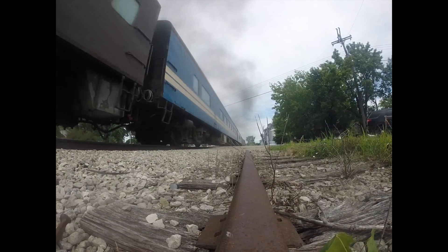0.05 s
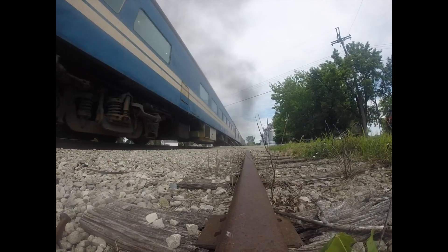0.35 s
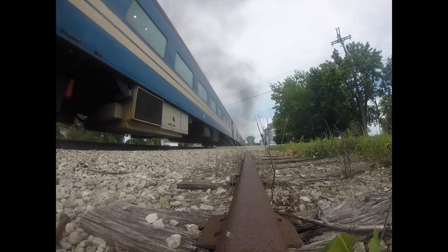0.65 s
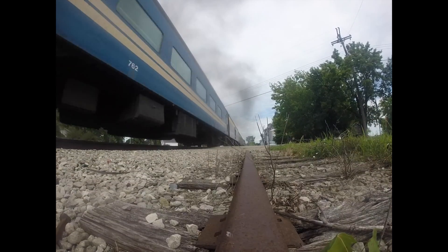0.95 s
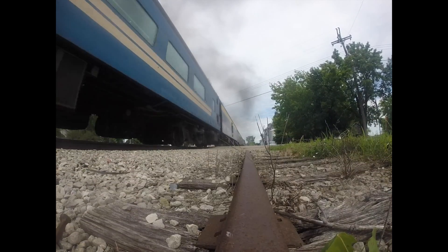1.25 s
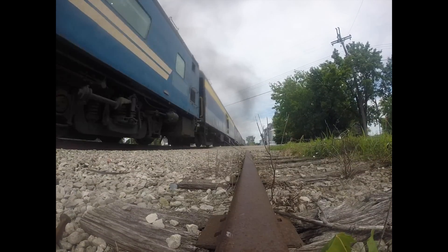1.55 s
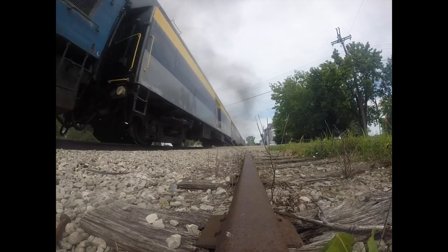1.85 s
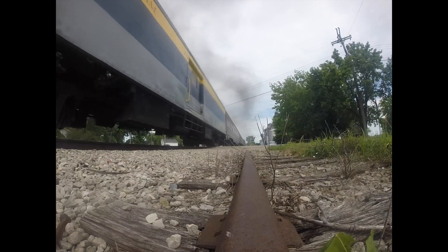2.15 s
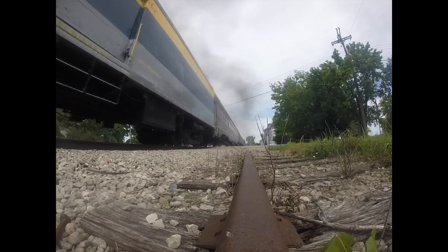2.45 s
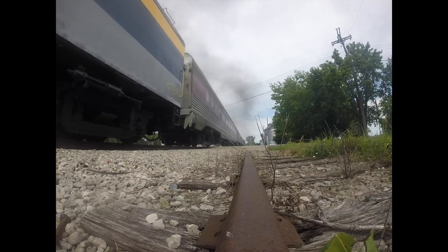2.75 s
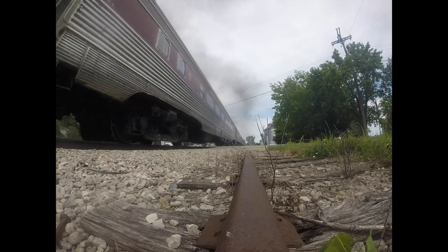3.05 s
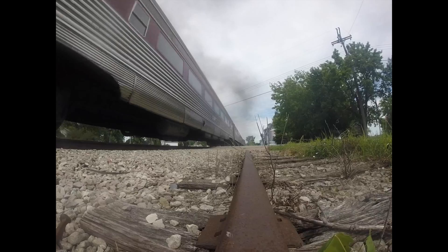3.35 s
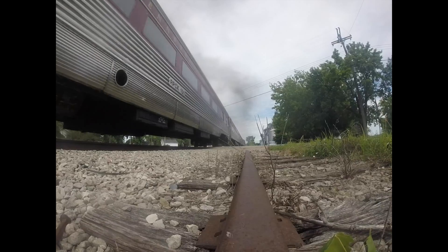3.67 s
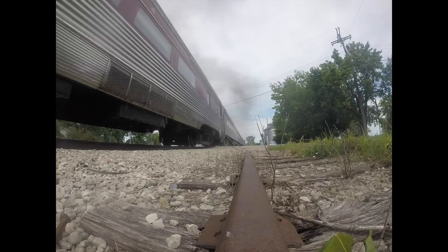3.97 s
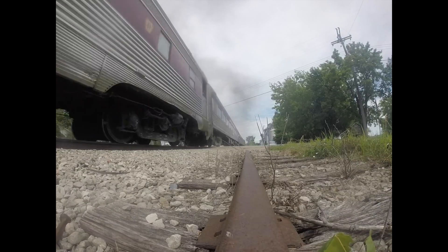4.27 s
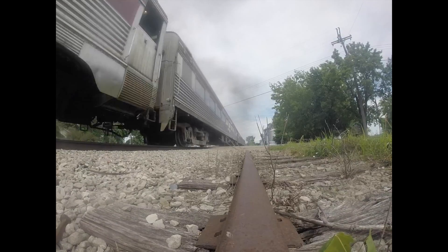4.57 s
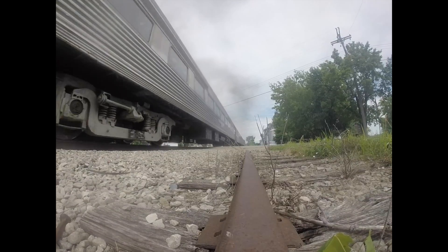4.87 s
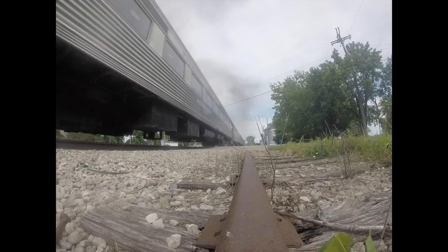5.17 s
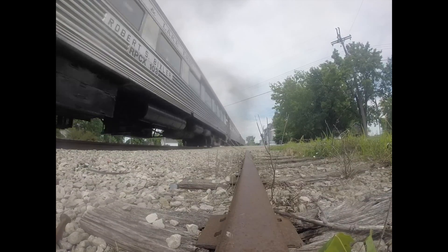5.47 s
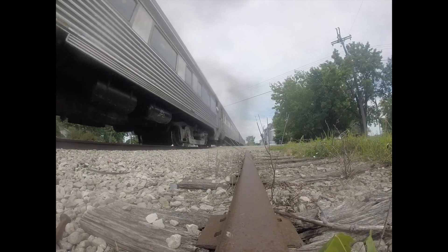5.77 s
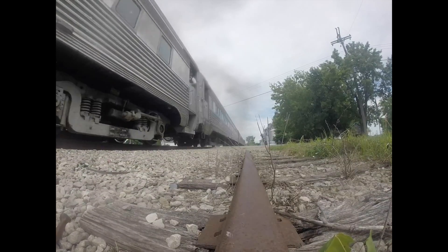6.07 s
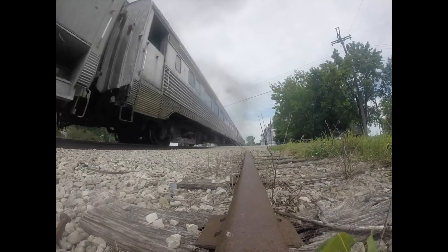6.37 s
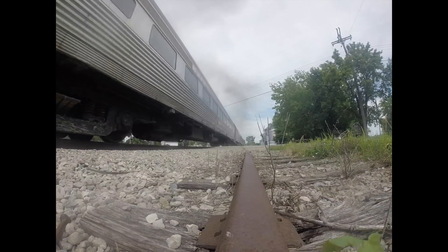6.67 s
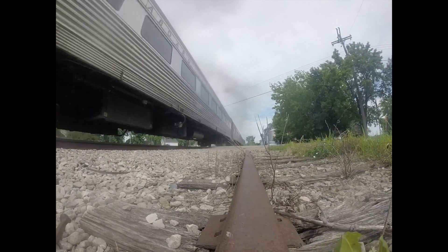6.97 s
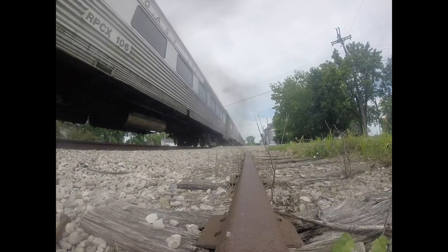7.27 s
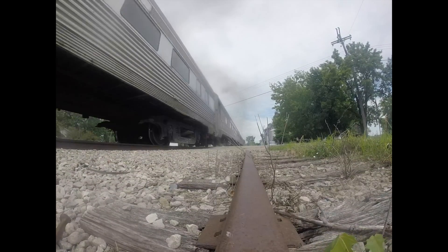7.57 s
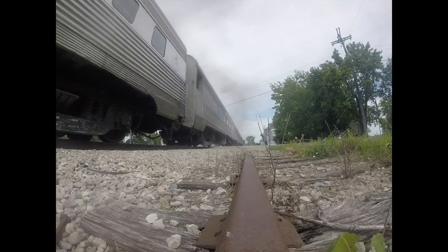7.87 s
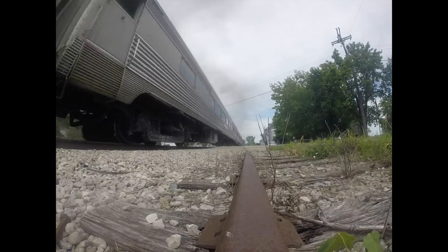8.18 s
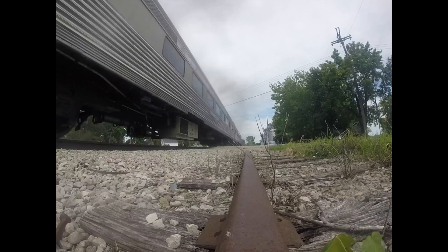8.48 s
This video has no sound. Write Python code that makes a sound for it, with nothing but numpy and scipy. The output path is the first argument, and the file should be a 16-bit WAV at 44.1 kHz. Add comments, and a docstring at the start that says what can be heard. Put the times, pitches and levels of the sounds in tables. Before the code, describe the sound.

Hard, evenly spaced wheel clacks open over a deep rumble and recede as a passenger train keeps rolling by, close to a microphone on the neighboring rail. One sharp metal screech follows. Each set of wheels brings a swell of roar with scraping, thin squeals and clinking steel, while the trembling ground makes the microphone mount thud and rattle. A generator hums past briefly in the second half, and grit ticks lightly at the finish.

```python
"""A deep rumble and a hard clack-clack come first: passenger coaches roll past, and a wheel with a flat
spot strikes the rail once a turn, fading into the distance. The shaking ground sways a mount on the
next rail near 40 Hz and makes it chatter. Wheels roar, grind and squeal as they pass; loose steel clinks.
The gangway plates between two coaches screech once, a generator drones by under one coach,
and near the end a few specks of grit tick."""
import sys
import numpy as np
from scipy import signal
from scipy.fft import rfft, irfft, next_fast_len
from scipy.io import wavfile
from scipy.ndimage import uniform_filter1d, map_coordinates

SR = 44100
rng = np.random.default_rng(int(sys.argv[2]) if len(sys.argv) > 2 else 0)


def unload_audio(sound):
    """Save the sound as a 16-bit wav file, at the path given as the first command line argument."""
    columns = np.transpose(np.atleast_2d(sound))
    # keep every value between -1 and 1, then stretch to whole-number steps
    steps = np.round(np.clip(columns, -1, 1) * 32767)
    wavfile.write(sys.argv[1], SR, steps.astype(np.int16))


N = 376159
T = np.arange(N) / SR

# Levels in the tables are relative: each source sets its own overall loudness.
# grit landing on the case that the mount holds (time [s], level [dB])
GRIT_TICKS = [(8.069, -35), (8.211, -29), (8.3569, -40), (8.441, -13)]
# resonances of the generator's silencer (pitch [Hz], width [Hz], level [dB])
SILENCER_MODES = [(132, 15, -9), (172.1, 37.4, 6), (205, 50, 4.5), (340, 78, -8), (580, 380, -17)]

# swells of the mount's sway, each lasting until the next (start [s], level [dB])
SWAY_SWELLS = [(-.15, -10), (.2, -12.5), (.38, -16), (.55, -14.5), (.77, -12), (.86, -11.5), (1.01, -11.5),
               (1.15, -13.5), (1.3, -6), (1.61, -8.5), (1.77, -8), (2.07, -9.5), (2.25, -8.5), (2.44, -15),
               (2.68, -12), (2.99, -7), (3.3, -8), (3.49, -7.5), (3.68, -9.5), (3.85, -12.5), (4.0, -14.5),
               (4.13, -14.5), (4.27, -8.5), (4.79, -6.5), (5.04, -9), (5.36, -12), (5.57, -17.5),
               (5.82, -14.5), (5.96, -7.5), (6.31, -8), (6.43, -9), (6.67, -7), (6.9, -9), (7.14, -8.5),
               (7.28, -13), (7.43, -12), (7.601, -15.5), (7.69, -10.5), (7.87, -6), (8.1, -6), (8.25, -7.5),
               (8.4, -8)]
# how fast the mount sways (time [s], pitch [Hz])
SWAY_PITCH = [(0, 40.37), (.85, 39.72), (1.05, 42.7), (1.4, 44.05), (1.75, 42.43), (2.2, 44.15),
              (2.8, 40.4), (3.02, 41.48), (3.2, 38.9), (3.45, 41.46), (3.78, 38.51), (4.22, 43.38),
              (4.55, 37.21), (5.2, 39.37), (5.7, 41.9), (6.55, 38.38), (7.3, 39.5), (8.2, 41.2),
              (8.53, 39.1)]
# resonances of the mount (pitch [Hz], width [Hz], level [dB])
MOUNT_MODES = [(73, 23, 8.5), (104.5, 24, -3), (170, 63, -14), (227.4, 28.5, 6.5), (337, 90, -13.5),
               (440.5, 51, -5)]
# bouts of the mount chattering on the rail (start [s], length [s], level [dB])
CHATTER_BOUTS = [(0.056, 0.0047, -20), (0.183, 0.017, -24), (0.246, 0.1, -19), (0.352, 0.089, -20.5),
                 (0.638, 0.044, -16), (0.782, 0.035, -19.5), (0.839, 0.052, -17.5), (1.289, 0.072, -28),
                 (2.272, 0.049, -29.5), (3.046, 0.016, -20.5), (3.16, 0.023, -14.5), (3.188, 0.029, -11.5),
                 (3.355, 0.044, -20), (3.531, 0.038, -18), (3.638, 0.044, -19), (3.688, 0.096, -16.5),
                 (4.474, 0.021, -17), (4.558, 0.036, -11.5), (4.625, 0.064, -15.5), (4.812, 0.066, -20.5),
                 (4.909, 0.031, -11.5), (4.996, 0.015, -17.5), (5.077, 0.11, -16.5), (5.197, 0.036, -15.5),
                 (6.031, 0.052, -23), (6.129, 0.046, -17), (6.352, 0.029, -23.5), (6.406, 0.015, -15.5),
                 (6.486, 0.028, -14), (6.733, 0.05, -18.5), (8.11, 0.021, -24.5), (8.349, .015, -21)]
# tones in the mount's boom (multiple of the lowest pitch [ratio], level [dB])
JUDDER_HARMONICS = [(1, -7.5), (2, -0.5), (4, -20)]

# gangway plates rubbing (time [s], slip rate [Hz], level [dB])
PLATE_RUB = [(1.645, 948, -100), (1.655, 949, -66), (1.665, 950, -38), (1.70, 919, -23), (1.74, 908, -23.5),
             (1.785, 921, -27), (1.81, 920, -29.5), (1.87, 914, -39), (1.95, 920, -50), (2.0, 888, -52),
             (2.5, 900, -100)]
# tone colour of that rubbing (frequency [Hz], level [dB])
PLATE_SPECTRUM = [(500, -36), (930, -24), (1850, -6), (2770, 3.5), (3700, 1.5), (4600, 3.5), (5400, -8),
                  (6500, -3), (8000, -16), (9800, -5.5), (12000, -13), (15000, -21)]
# piercing notes of the plates (start [s], length [s], pitch [Hz], level [dB])
PLATE_CRIES = [(1.702, .016, 1700, -29.5), (1.73, 0.013, 1900, -29), (1.5, .022, 2800, -27),
               (1.732, .02, 2775, -25), (1.753, 0.0383, 2750, -19.5), (1.738, 0.0354, 3660, -21.5),
               (1.778, .017, 3620, -30), (1.78, .016, 4600, -29), (1.745, 0.032, 5560, -33),
               (1.698, 0.03, 6520, -29), (1.758, 0.027, 6470, -26.5), (1.785, 0.024, 6440, -32),
               (1.71, .085, 9370, -37.5), (1.7, .09, 8470, -44), (1.71, .09, 10900, -43)]
# knocks of loose steel (time [s], ring [dB], hollow low note [dB], crunch [dB])
STEEL_KNOCKS = [(.611, -11.5, -21, -14), (.623, -16, -27, -25), (.635, -14, -34, -19),
                (.792, -14.5, -17, -18), (.803, -26, -30, -22), (.976, -25, -29, -30),
                (.993, -22, -23, -28), (1.137, -34, -38, -26), (2.046, -23, -42, -28),
                (2.06, -24, -45, -24), (2.076, -24, -40, -24), (2.229, -25, -38, -28),
                (2.242, -29, -35, -18), (2.274, -27, -40, -22), (3.366, -25, -31, -22),
                (3.383, -20.5, -25, -24), (3.404, -32, -31, -36), (3.425, -29, -26, -34),
                (3.46, -32, -29, -33), (3.49, -30, -34, -26), (3.54, -20, -23.5, -26),
                (3.561, -27, -26, -35), (3.634, -28, -28, -32), (3.736, -22.5, -29, -21),
                (3.752, -30, -42, -37), (3.857, -35, -48, -48), (3.898, -40, -35, -46),
                (3.915, -32, -39, -41), (5.328, -34, -33, -37), (5.346, -28, -42, -27),
                (5.359, -20, -30, -25), (5.378, -27, -21, -26), (5.392, -32, -41, -35),
                (5.414, -28, -30, -36), (5.432, -39, -32, -42), (6.319, -37, -29, -38),
                (6.361, -32, -27, -30), (6.536, -12, -24, -41), (6.547, -28, -50, -40),
                (6.871, -29, -26, -36), (6.906, -27, -27, -32), (6.924, -26, -32, -37),
                (7.038, -27, -40, -24), (7.051, -23, -25, -24), (7.086, -31, -34, -32),
                (8.048, -38, -31, -29), (8.12, -30, -33, -32), (8.283, -41, -31, -33)]
# ringing notes of the loose steel (pitch [Hz], time to fade by 60 dB [s], level [dB])
STEEL_MODES = [(1440, 0.028, -15), (1910, 0.04, -14), (2250, 0.093, -4), (2460, 0.042, -5.5),
               (2664, 0.058, -3.5), (2787, 0.049, -1)]

# couplings between coaches going by (time when nearest [s], light chatter [dB], rumble [dB], roar [dB])
COUPLING_PASSES = [(0.302, -34, -29, -33), (1.66, -47.5, -36, -32.5), (3.22, -52, -34.5, -34.5),
                   (4.72, -38, -28.5, -34.5), (6.4, -44, -29, -34.5), (8.1, -42.5, -38, -36)]
# tone colours of the wheels' rumble, roar and hiss (frequency [Hz], level [dB])
RUMBLE_SPECTRUM = [(25, -43), (60, 0), (120, -17.5), (220, -11.5), (450, -20), (900, -80)]
ROAR_SPECTRUM = [(80, -27), (220, -3.5), (450, 2), (700, -2), (950, -4), (1200, -6.5), (1700, -3.5),
                 (2500, -5), (4200, -6.5), (5300, -28), (7000, -26), (15000, -39)]
HISS_SPECTRUM = [(2500, -17), (4500, 2), (6300, -2), (7400, -4.5), (8300, -15.5), (10500, -15.5),
                 (12500, -26.5), (15000, -39)]
# rise and fall of the hiss (time [s], level [dB])
HISS_SWELLS = [(0, -32.5), (.42, -35), (.7, -41), (2.1, -47.5), (2.55, -45), (3.02, -38.5), (3.5, -41),
               (3.95, -44.5), (4.35, -35.5), (4.75, -46), (4.95, -42.5), (5.45, -51), (5.75, -37),
               (6.15, -39), (6.82, -49), (7.0, -40.5), (7.3, -37.5), (7.65, -45.5), (7.9, -42),
               (8.53, -43.5)]
# resonances of the rail (pitch [Hz], width [Hz], level [dB])
RAIL_MODES = [(891, 120, -11), (1475, 106, 3.5), (1857, 103, 0.5), (2465, 260, -1), (2774, 48, 2),
              (3423, 354, 1), (4162, 150, -3), (4760, 270, -10), (5740, 120, -10), (6176, 270, -7.5)]
# wheels grinding on the rail (middle [s], half length [s], pitch [Hz], width [Hz], level [dB])
WHEEL_SCRAPES = [(2.286, 0.045, 3800, 1500, -33), (2.852, 0.24, 3570, 2200, -38),
                 (3.02, .03, 384, 180, -30.5), (3.05, 0.091, 3160, 3000, -32),
                 (3.198, 0.15, 2970, 3205, -35.5), (3.366, 0.081, 3620, 3497, -30.5),
                 (3.474, 0.087, 3770, 3000, -33), (4.577, 0.087, 2200, 2001, -39.5),
                 (4.77, .09, 338, 70, -34), (4.82, 0.052, 2200, 2000, -38), (5.779, 0.037, 3479, 700, -29),
                 (5.847, 0.064, 3700, 1001, -33), (5.925, 0.081, 3480, 1800, -36),
                 (6.092, .07, 2200, 2795, -32.5), (6.16, 0.029, 2985, 3400, -32),
                 (6.35, 0.081, 2600, 2393, -37), (7.305, 0.13, 2180, 1997, -35.5),
                 (8.056, .025, 2603, 3000, -36), (8.102, 0.051, 2982, 2820, -30),
                 (8.263, 0.066, 2700, 2400, -35.5)]
# squeals of the flanges, the wheels' guiding rims (middle [s], half length [s], pitch [Hz], level [dB])
FLANGE_SQUEALS = [(1.991, 0.043, 3560, -32), (2.254, 0.12, 4910, -40), (2.409, 0.086, 1902, -33),
                  (2.42, 0.047, 3470, -29), (2.768, 0.093, 4410, -40), (2.899, 0.073, 3520, -33),
                  (3.002, .07, 4460, -35), (3.313, 0.024, 3390, -35), (3.373, 0.052, 5080, -37),
                  (3.485, 0.039, 3490, -35), (3.485, 0.017, 1450, -29.5), (3.521, 0.072, 5050, -48),
                  (3.555, 0.029, 3420, -34), (3.67, 0.04, 4975, -45), (3.845, 0.031, 3347, -34),
                  (6.14, .04, 4130, -27), (6.169, 0.032, 3400, -33), (6.528, 0.027, 3570, -29),
                  (6.995, 0.08, 4490, -41), (8.148, 0.027, 3270, -32), (8.362, 0.034, 4130, -35)]
# wheels that sing as they pass (time when nearest [s], main pitch [Hz], level [dB])
SINGING_WHEELS = [(0.31, 4200, -35.5), (0.43, 4085, -32.5), (2.081, 4230, -50), (2.26, 4020, -42),
                  (2.8, 4480, -44), (3.02, 4370, -43.5), (3.22, 4140, -45.5), (3.47, 4340, -46),
                  (4.42, 4124, -40), (4.68, 4240, -51), (4.99, 4120, -44), (5.22, 4230, -51.5),
                  (6.14, 4137, -45.5), (6.39, 4350, -45.5), (6.59, 4065, -44), (6.891, 4100, -44.5),
                  (7.86, 4100, -44.5), (8.33, 4063, -43.5)]
# ringing notes of one wheel (multiple of the main pitch [ratio], level [dB])
WHEEL_NOTES = [(0.625, -5), (.812, 0), (1, 1), (1.165, -5.5), (1.49, -13.5)]

# tone colour of the flat spot's crash (frequency [Hz], level [dB])
CLACK_SPECTRUM = [(100, 18.5), (300, 18), (600, 7.5), (950, 10), (1500, 9), (2600, 3.5), (3600, 9.5),
                  (5000, -5), (6500, -21), (8500, -12), (11000, -20), (15000, -28)]
# boosts and cuts for the flat spot's first, close strikes (strength [dB], brightness [dB], ring [dB])
CLOSE_STRIKES = [(-8.5, 7.5, -24), (0, 0, -0.5), (1.5, -3.5, -4), (-2.5, 5.5, -23), (5, -3.5, -8.5)]
# ringing notes of the struck wheel (pitch [Hz], time to fade by 60 dB [s], level [dB])
CLANG_MODES = [(884, 0.053, 0.5), (1500, 0.12, -9), (1960, 0.18, -10), (2640, 0.1, -9), (3460, 0.17, 3.5),
               (4700, 0.12, -10), (5700, 0.16, -18), (6440, 0.14, -13)]

SPEED_M_S, TRACK_M = 16, 3  # speed of the train, distance to its track
BOGIE_M = 2.4  # from a coupling to the bogie (wheeled frame) on either side
SHAKE_REACH_M, ROAR_REACH_M = 4.5, 6.94  # a bogie this far along the track is heard at half power
CHATTER_ATTACK_S, CHATTER_DECAY_S = 0.0056, 0.025
KNOCK_RISE_S = 0.0032


def undb(db):
    """Turn decibels into a gain."""
    return 10 ** (np.asarray(db) / 20)


def unit(x):
    """Scale a signal to an average power of 1."""
    return x / np.sqrt(np.mean(x ** 2))


def curves(table):
    """Turn a table that starts with a time column into curves, one value a sample."""
    times, *columns = np.transpose(table)
    return [np.interp(T, times, column) for column in columns]


def noise():
    """White noise."""
    return rng.standard_normal(N)


def walk(rate):
    """A random wobble of size about 1 that heads for a new value `rate` times a second."""
    knots = rng.standard_normal(N // 8)
    return unit(np.interp(T * rate, np.arange(len(knots)), knots))


def colour(x, points):
    """Shape a sound with a spectrum of (frequency [Hz], level [dB]) points."""
    hz, db = np.transpose(points)
    size = next_fast_len(N + 8192)
    bin_hz = np.maximum(np.arange(size // 2 + 1) * SR / size, 1)
    gain = undb(np.interp(np.log(bin_hz), np.log(hz), db))
    return irfft(rfft(x, size) * gain, size)[:N]


def lowpass(x, hz, order=6):
    """Take off the treble above `hz`."""
    return signal.sosfilt(signal.butter(order, min(hz, .45 * SR), fs=SR, output="sos"), x)


def ring(x, modes):
    """Pass a sound through resonances (pitch [Hz], width [Hz], level [dB])."""
    return sum(undb(db) * signal.lfilter(*signal.iirpeak(hz, hz / width, fs=SR), x)
               for hz, width, db in modes)


def steep(x, mode):
    """Apply one resonance twice, so that little gets through away from its pitch."""
    hz, width, _ = mode
    return ring(ring(x, [(hz, width, 0)]), [mode])


def pulses(turns, scatter_db):
    """One click of random size each time `turns` passes a whole number."""
    at = np.flatnonzero(np.diff(np.floor(np.maximum.accumulate(turns))) > 0)
    out = np.zeros(N)
    out[at] = undb(scatter_db * noise()[:len(at)])
    return out


def blows(times, dbs):
    """Single clicks at given times and levels."""
    out = np.zeros(N)
    out[np.clip((np.asarray(times) * SR).astype(int), 0, N - 1)] = undb(dbs)
    return out


def fade(x, t60):
    """Give each click a tail that falls by 60 dB in `t60` seconds."""
    return signal.lfilter([1], [1, -np.exp(-np.log(1000) / (t60 * SR))], x)


def bout(start, length, attack_s, decay_s):
    """A loudness curve that rises, holds and dies away."""
    return np.clip((T - start) / attack_s, 0, 1) * np.exp(-np.clip(T - start - length, 0, 1) / decay_s)


def bogies(dbs, reach_m):
    """A gain that swells as the two bogies at each coupling roll by, given one level a coupling."""
    power = 0
    for (nearest_s, *_), db in zip(COUPLING_PASSES, dbs):
        for offset_m in (-BOGIE_M, BOGIE_M):
            along_m = SPEED_M_S * (T - nearest_s) + offset_m
            power = power + undb(db) ** 2 / (1 + (along_m / reach_m) ** 2)
    return np.sqrt(power / 2)


def grit():
    """Specks of grit hit the case on the mount, each with a tiny bright tick."""
    bright = unit(ring(noise(), [(5494, 6500, -1.5), (10870, 10600, -10)]))
    return undb(-2) * bright * fade(blows(*np.transpose(GRIT_TICKS)), t60=0.0057)


def generator(nearest_s=5.915, firing_hz=60.64, pass_s=0.209, level_db=-25, throb_db=6):
    """An engine under the floor fires into its silencer; the drone drops in pitch as it goes by."""
    away = (T - nearest_s) / pass_s
    turns = np.cumsum(firing_hz * (1 - 0.044 * np.tanh(away))) / SR
    turns -= np.interp(nearest_s, T, turns)
    gas = pulses(turns, scatter_db=1) + .016 * noise()
    boom = sum(steep(gas, mode) for mode in SILENCER_MODES)
    throb = undb(throb_db * np.cos(np.pi * turns / 2))  # four unequal cylinders: one throb in four firings
    return unit(throb * boom) * undb(level_db) / (1 + away ** 2) ** 0.97


def sway_strength():
    """The sway grows and shrinks in rounded arches, almost stopping between them."""
    starts, db = np.transpose(SWAY_SWELLS)
    place = np.interp(T, np.append(starts, N / SR + .05), np.arange(len(starts) + 1))
    arch = np.sin(np.pi * (place % 1) ** 0.91) ** 0.7
    return uniform_filter1d(undb(db)[place.astype(int)] * arch, size=1100)


def judder(turns, judder_hz=112.5, rise=0.07, rise_s=0.055):
    """In each bout of chatter the mount booms on a low note that rises a little, jolted once a swing."""
    out, drift = np.zeros(N), .01 * walk(70)
    jolt = .1 * np.sin(2 * np.pi * turns)
    for start, length, db in CHATTER_BOUTS:
        near = (T > start) & (T < start + length + .2)
        hz = judder_hz * (1 + rise * np.tanh((T[near] - start) / rise_s) + drift[near])
        phase = 2 * np.pi * (np.cumsum(hz) / SR + rng.random()) + jolt[near]
        note = sum(undb(tone_db) * np.sin(k * phase) for k, tone_db in JUDDER_HARMONICS)
        out[near] += undb(db) * bout(start, length, CHATTER_ATTACK_S, CHATTER_DECAY_S)[near] * note
    return out


def mount():
    """Shaking ground sways the mount; when it chatters, its foot thuds and ticks on the rail each swing."""
    turns = np.cumsum(curves(SWAY_PITCH)[0] * (1 + 0.02503 * walk(9))) / SR
    sway = sway_strength() * unit(np.sin(2 * np.pi * turns))
    tremor = unit(steep(noise(), (40, 20, 0)))  # the ground never quite rests
    knocks = pulses(turns + .03 * walk(60), scatter_db=2.5)
    scuffs = 0.014 * noise()
    body = lowpass(sum(steep(knocks + scuffs, mode) for mode in MOUNT_MODES), hz=540)
    body /= np.sqrt(uniform_filter1d(body ** 2, SR // 25) + 1e-12)  # even out the loudness
    bouts = sum(undb(db) * bout(start, length, CHATTER_ATTACK_S, CHATTER_DECAY_S)
                for start, length, db in CHATTER_BOUTS)
    _, chatter_db, *_ = np.transpose(COUPLING_PASSES)
    light_chatter = bogies(chatter_db, SHAKE_REACH_M) * undb(6.5 * walk(12))
    thuds = (light_chatter + .4 * bouts) * body
    bright = unit(steep(noise(), (6000, 5000, 0)))
    ticks = (light_chatter + bouts) * lowpass(fade(knocks, t60=0.0035) * bright, hz=9900)
    return sway + undb(-27) * tremor + undb(-1.5) * (thuds + judder(turns)) + undb(-20) * ticks


def rattle(level_db=-8, taps_per_s=30):
    """Brake gear and springs jiggle on each passing bogie: small uneven taps, each ringing one note."""
    *_, roar_db = np.transpose(COUPLING_PASSES)
    jiggle = 0
    for hz, width, db in RAIL_MODES:
        taps = pulses(np.cumsum(taps_per_s * undb(6 * walk(25))) / SR, scatter_db=4)
        jiggle += undb(db) * unit(ring(taps, [(hz, width, 0)]))
    return unit(lowpass(jiggle, hz=5800)) * undb(level_db) * bogies(roar_db, SHAKE_REACH_M)


def clinks(hollow_hz=921, hollow_t60_s=0.051, crunch_t60_s=0.077, detune=0.016, scatter_db=2):
    """Loose steel knocks with a buzzing ring, a hollow low note and a short crunch, never twice alike."""
    out, t = np.zeros(N + SR), np.arange(SR // 4) / SR
    modes = [(hollow_hz, hollow_t60_s, 0)] + STEEL_MODES
    top_hz = modes[-1][0]
    for start, ring_db, hollow_db, crunch_db in STEEL_KNOCKS:
        crunch = unit(steep(rng.standard_normal(len(t)), (1800, 1700, 0)))
        knock = crunch * undb(crunch_db - 4 - 60 * t / crunch_t60_s)
        for k, (hz, t60, mode_db) in enumerate(modes):
            pitch_chance, level_chance = rng.standard_normal(2)
            jitter = unit(uniform_filter1d(rng.standard_normal(len(t)), size=130))
            buzz = .5 * hz / top_hz * jitter  # the loose contact roughens the note
            turns = hz * (1 + detune * pitch_chance) * t + rng.random()
            db = (ring_db if k else hollow_db) + mode_db + scatter_db * level_chance
            knock += np.sin(2 * np.pi * turns + buzz) * undb(db - 60 * t / t60)
        out[int(start * SR):][:len(t)] += knock * np.minimum(t / KNOCK_RISE_S, 1)
    return lowpass(out[:N], hz=4080)


def gangway_screech(sag_per_s=0.2, attack_s=0.0067):
    """Steel plates stick and slip with a rasp, and jump between piercing notes that sink slightly."""
    slip_hz, rub_db = curves(PLATE_RUB)
    slip_turns = np.cumsum(slip_hz * (1 + .035 * walk(500) + .007 * walk(50))) / SR
    slips = unit(pulses(slip_turns, scatter_db=3))
    rasp = undb(-1) * noise()
    notes, wobble, flicker = 0, .011 * walk(600), undb(2 * walk(120))
    for start, length, hz, db in PLATE_CRIES:
        sag = sag_per_s * np.clip(T - start - length / 2, -length, length)
        turns = np.cumsum(hz * (1 - sag + wobble)) / SR
        burst = bout(start, length, attack_s, decay_s=0.0048)
        tail = undb(-17) * bout(start, length, attack_s, decay_s=0.087)
        notes += undb(db) * (burst + tail) * np.sin(2 * np.pi * turns)
    rub = unit(colour(slips + rasp, PLATE_SPECTRUM)) * undb(rub_db + walk(160))
    return rub + flicker * notes


def scrapes(level_db=-2, slips_per_s=1500):
    """A wheel grinds for a moment: many tiny uneven slips set wheel and rail ringing."""
    turns = np.cumsum(slips_per_s * undb(4 * walk(900))) / SR
    slips = unit(pulses(turns, scatter_db=4) * noise())
    steel = unit(ring(slips, RAIL_MODES)) + .5 * slips
    out = 0
    for middle, half_length, hz, width, db in WHEEL_SCRAPES:
        swell = np.cos(np.pi / 2 * np.clip((T - middle) / half_length, -1, 1)) ** 2
        out += unit(steep(steel, (hz, width, 0))) * undb(db) * swell
    return lowpass(out, hz=5750) * undb(level_db + 2 * walk(90))


def squeals(level_db=-2, sag_per_s=0.152):
    """A flange catches the rail for a moment: a wavering note that sinks as the wheel goes by."""
    out, flicker = np.zeros(N), undb(3.5 * walk(200))
    wobble = .006 * walk(600) + .002 * walk(50)
    for middle, half_length, hz, db in FLANGE_SQUEALS:
        near = np.abs(T - middle) < half_length
        away_s = T[near] - middle
        turns = np.cumsum(hz * (1 - sag_per_s * away_s + wobble[near])) / SR
        swell = undb(db + level_db) * np.cos(np.pi / 2 * away_s / half_length) ** 2
        out[near] += swell * flicker[near] * np.sin(2 * np.pi * turns)
    return out


def singing_wheels(glide=0.036, glide_s=0.24, swell_s=0.13):
    """Each wheel rings on a few slightly rough notes that swell and fall in pitch as it passes."""
    out, flicker = np.zeros(N), undb(3 * walk(45))
    knot_s = np.linspace(-1, 1, 270)
    for nearest_s, hz, db in SINGING_WHEELS:
        near = np.abs(T - nearest_s) < 1
        away_s = T[near] - nearest_s
        phase = 2 * np.pi * hz * np.cumsum(1 - glide * np.tanh(away_s / glide_s)) / SR
        swell = undb(db) / (1 + (away_s / swell_s) ** 2) * flicker[near]
        for ratio, note_db in WHEEL_NOTES:
            # contact with the rail keeps each note going with uneven pushes
            pushes = .7 * rng.standard_normal((2, len(knot_s)))
            cos_push, sin_push = (np.interp(away_s, knot_s, push) for push in pushes)
            note = (.7 + cos_push) * np.cos(ratio * phase) + sin_push * np.sin(ratio * phase)
            out[near] += undb(note_db) * swell * note
    return out


def rail_sound(flicker_db, drift=.018):
    """The rail's resonances, each shaken unevenly; moving wheels pull their pitch about."""
    ringing = sum(steep(noise(), mode) * undb(flicker_db * walk(14)) for mode in RAIL_MODES)
    place = np.cumsum(1 + drift * walk(5))
    return unit(map_coordinates(ringing, [place], order=3, mode="mirror"))


def rolling():
    """Rough wheels on rough rails: a rumble and a roar that swell with the bogies, and a gritty hiss."""
    *_, rumble_db, roar_db = np.transpose(COUPLING_PASSES)
    (hiss_db,) = curves(HISS_SWELLS)
    rumble = unit(colour(noise(), RUMBLE_SPECTRUM)) * undb(2 * walk(30))
    broad = unit(colour(noise(), ROAR_SPECTRUM)) * undb(2.16 * walk(30))
    roar = (undb(-3.5) * broad + undb(-5.5) * rail_sound(flicker_db=2.5)) * undb(0.93 * walk(22))
    hiss = unit(colour(noise(), HISS_SPECTRUM)) * undb(hiss_db - 7.5 + 2 * walk(150))
    return rumble * bogies(rumble_db, SHAKE_REACH_M) + roar * bogies(roar_db, ROAR_REACH_M) + hiss


def flat_strikes(first_s=.0495, turn_s=.1738, nearest_s=.17, count=14, level_db=-13):
    """Time, level and brightness of the flat spot's strikes; distance delays and weakens them."""
    times = first_s + turn_s * np.arange(count)
    distance_m = np.hypot(SPEED_M_S * (times - nearest_s), TRACK_M)
    accent_db, bright_db, _ = np.pad(CLOSE_STRIKES, ((0, count - len(CLOSE_STRIKES)), (0, 0))).T
    arrivals = times + distance_m / 343  # sound travels 343 m/s
    return arrivals, level_db + accent_db - 20 * np.log10(distance_m / TRACK_M), bright_db + 3.5


def strike_train(times, db, blur_s=0.0063):
    """The flat spot's blows: sharp while close, blurred once they come from under the coaches."""
    close = len(CLOSE_STRIKES)
    keep = np.exp(-1 / (blur_s * SR))
    far = blows(times[close:], db[close:] + 1)  # distant, blurred clacks are lifted 1 dB to stay audible
    return blows(times[:close], db[:close]) + signal.lfilter([1 - keep], [1, -keep], far)


def flat_spot_clang(detune=0.012):
    """The close strikes of the flat spot set the wheel's steel ringing."""
    out, t = np.zeros(N), np.arange(SR // 3) / SR
    rise = np.minimum(t / KNOCK_RISE_S, 1)
    times, dbs, _ = flat_strikes()
    for start, db, (*_, ring_db) in zip(times, dbs, CLOSE_STRIKES):
        for hz, t60, mode_db in CLANG_MODES:
            note = np.sin(2 * np.pi * hz * (1 + detune * rng.uniform(-1, 1)) * t)
            out[int(start * SR):][:len(t)] += note * rise * undb(db + ring_db + mode_db - 60 * t / t60)
    return out


def flat_spot_clacks():
    """The flat spot hits the rail: a hard crash with a splash of hiss, then the rail rings on."""
    times, db, bright_db = flat_strikes()
    hits = uniform_filter1d(strike_train(times, db), size=40)  # contact builds over about a millisecond
    crash_fade = fade(hits, t60=0.08) + undb(-10.5) * fade(hits, t60=0.3)
    crash = unit(colour(noise(), CLACK_SPECTRUM)) * crash_fade
    rail = rail_sound(flicker_db=1.5) * fade(hits, t60=0.47)
    splash = unit(colour(noise(), HISS_SPECTRUM)) * fade(strike_train(times, db + bright_db), t60=0.48)
    return undb(1) * crash + undb(-4) * rail + undb(-19) * splash


def scene():
    """Add up everything heard from the next track, in one channel."""
    mix = mount() + rolling() + rattle() + scrapes() + singing_wheels() + squeals()
    mix += flat_spot_clacks() + flat_spot_clang()
    mix += clinks() + gangway_screech() + generator() + grit()
    return mix[None]


def record(dry, ceiling=0.85, top_hz=14900):
    """Round off the highest peaks and cut the very top of the treble."""
    rounded = dry / (1 + (dry / ceiling) ** 8) ** (1 / 8)
    return signal.sosfilt(signal.ellip(8, .2, 80, top_hz, fs=SR, output="sos"), rounded)


dry = scene()
out = record(dry)
unload_audio(out)
```